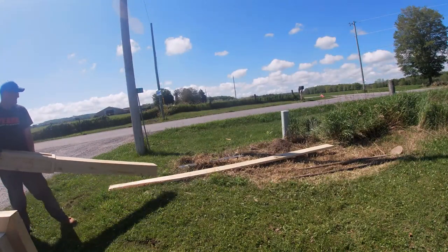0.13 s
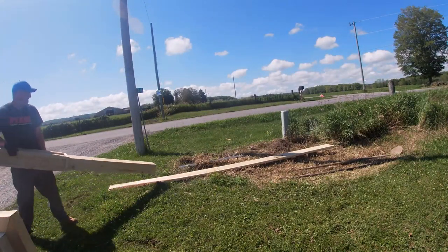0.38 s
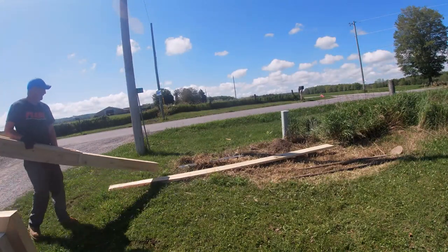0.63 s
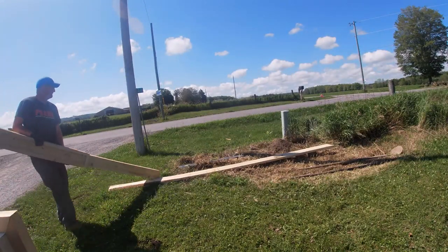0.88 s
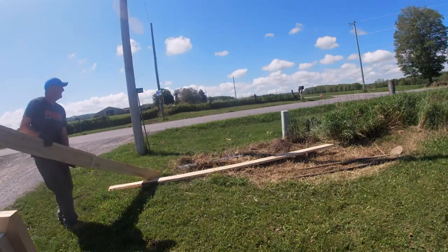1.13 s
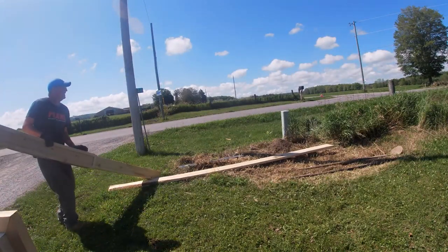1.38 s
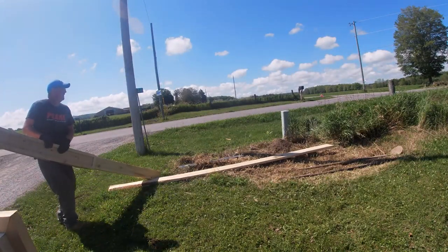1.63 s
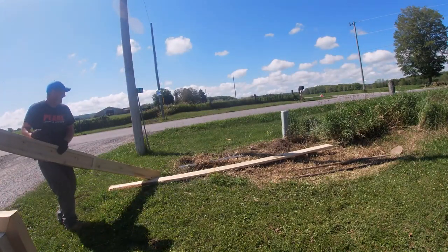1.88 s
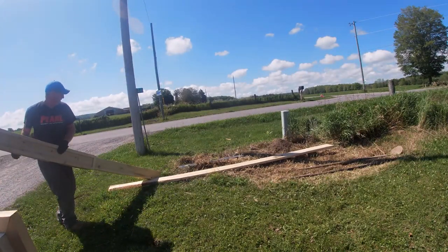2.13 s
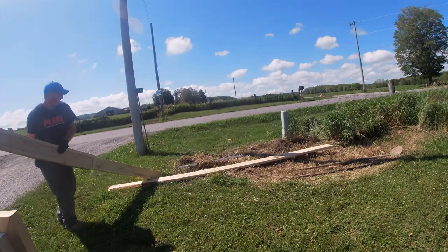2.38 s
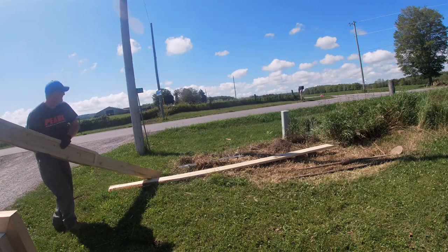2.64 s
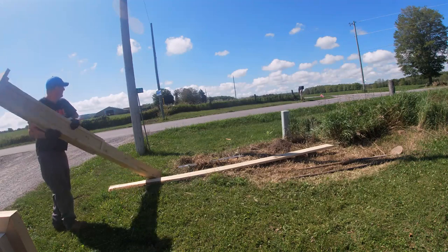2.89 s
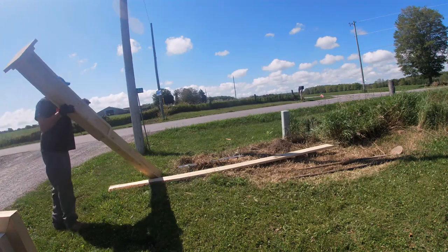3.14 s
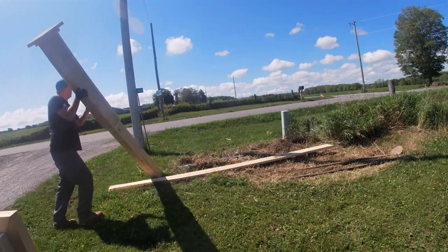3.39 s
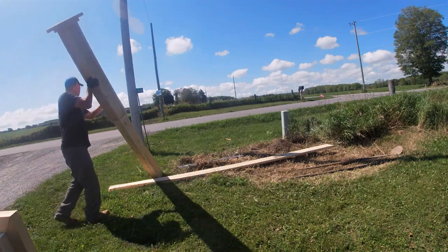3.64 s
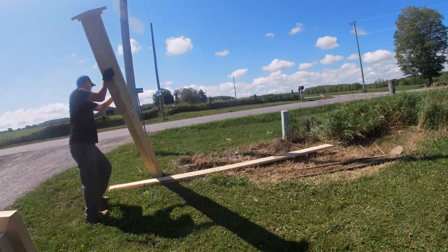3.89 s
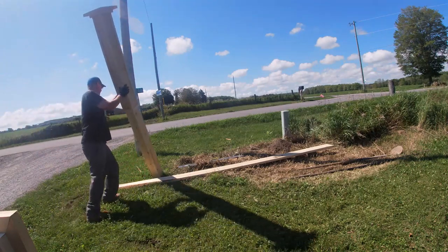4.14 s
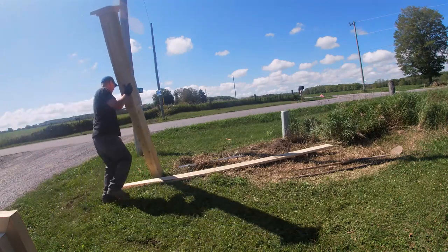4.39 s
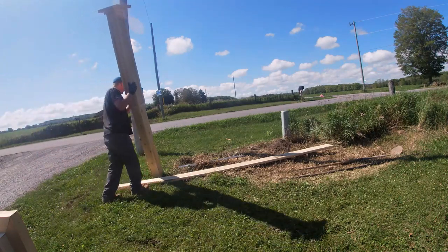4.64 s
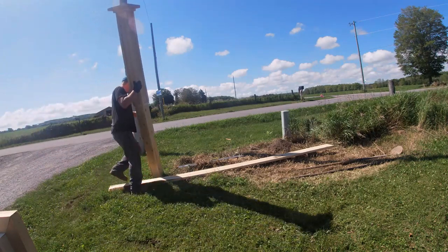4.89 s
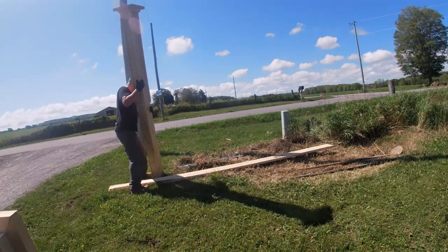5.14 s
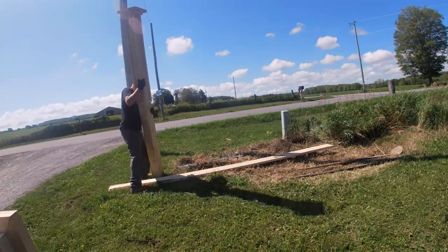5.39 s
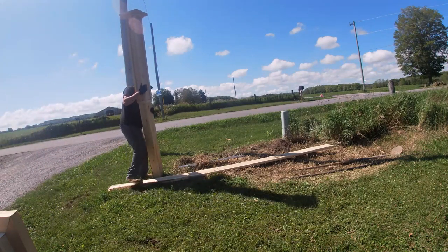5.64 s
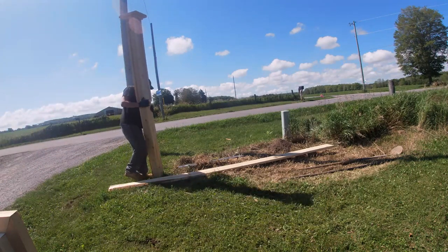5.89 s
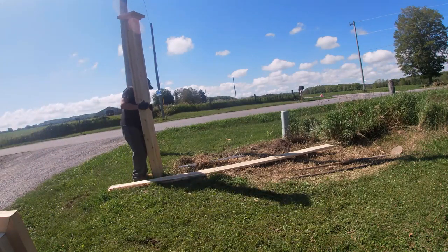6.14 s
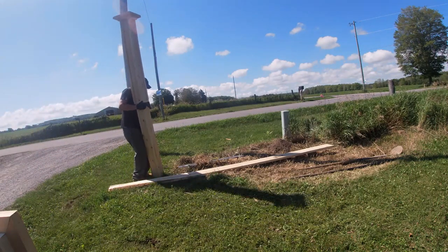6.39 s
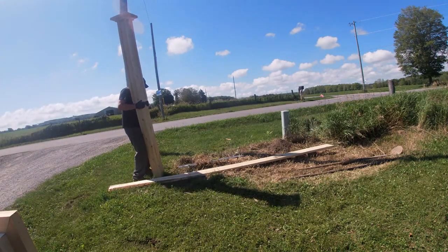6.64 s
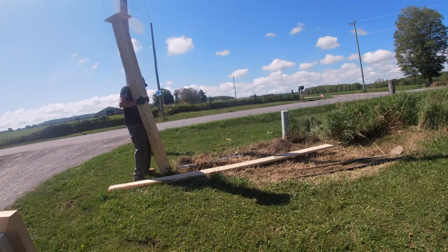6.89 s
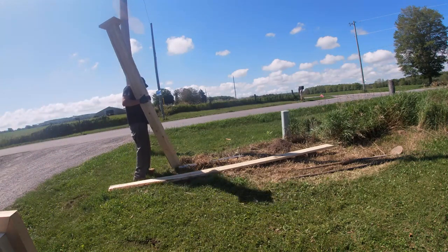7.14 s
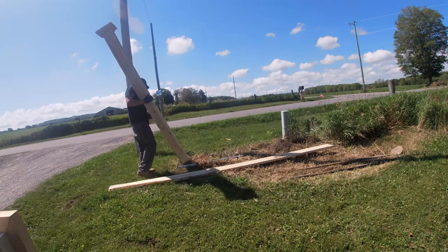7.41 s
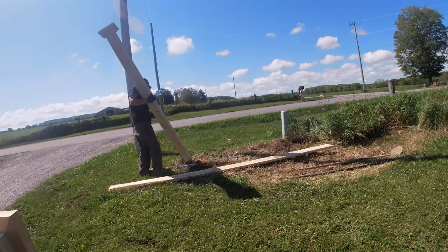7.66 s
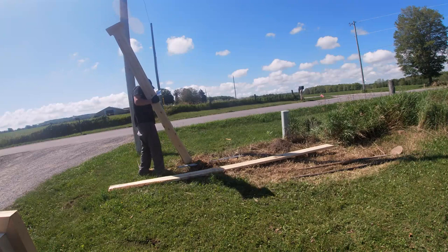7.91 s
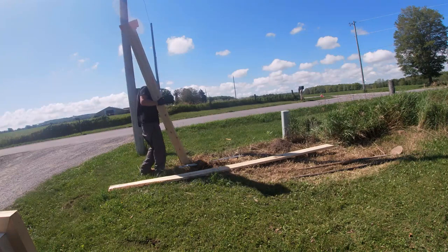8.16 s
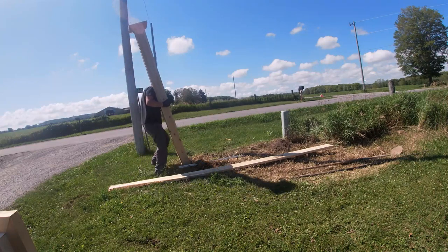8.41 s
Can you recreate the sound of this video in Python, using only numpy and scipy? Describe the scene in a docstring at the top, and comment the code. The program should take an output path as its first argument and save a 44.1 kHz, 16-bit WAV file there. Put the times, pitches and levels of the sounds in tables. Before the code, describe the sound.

Outdoors, hollow wooden knocks and dull thumps with gloved rubbing and grass rustle, over low engine rumble, wind buffeting and chirping birds.

```python
"""A worker handles a hollow wooden post by a country road, over far hiss, an idling engine and grass brushing.
Bird whistles, a soft gust and a faint low-mid scuff of filtered noise open it; ringing modal knocks begin
at half a second, stronger rubs after one. A thin insect whine fades after 2.5 s, while gusts of low noise
buffet the microphone until about 5 s. The densest knocks land near 4.7 s, the strongest gust near 6.5 s.
Climbing and falling bird notes, drawn as bent sine sweeps, lead to a buzzy chopped note at 8 s."""
import sys
import numpy as np
from scipy import signal
from scipy.fft import rfft, irfft, next_fast_len
from scipy.io import wavfile
from scipy.ndimage import map_coordinates

SR = 44100
rng = np.random.default_rng(int(sys.argv[2]) if len(sys.argv) > 2 else 0)


def generate_wav(signal):
    """Clip the signal to [-1, 1] and save it as 16-bit WAV at the path in sys.argv[1]."""
    frames = np.transpose(np.atleast_2d(signal))
    scaled = np.clip(frames, -1, 1) * 32767
    pcm = np.round(scaled).astype(np.int16)
    wavfile.write(sys.argv[1], SR, pcm)


def decibels_to_gain(level_db):
    """Convert a level in decibels to a linear amplitude gain (20 dB per decade)."""
    exponent = np.asarray(level_db, float) / 20
    return 10 ** exponent


N = 376173


def unit(x):
    """Scales x to rms 1."""
    return x / np.sqrt(np.mean(x ** 2) + 1e-20)


def along(points, hz):
    """Reads (Hz, value) points at hz on a log frequency axis."""
    f, v = np.transpose(points)
    return np.interp(np.log(hz + 1), np.log(f + 1), v)


def curves(rows):
    """Gives one value per sample for each column after the time."""
    s, *cols = np.transpose(rows)
    return [np.interp(np.arange(N) / SR, s, c) for c in cols]


def wobble(rate):
    """A smooth random curve with rate knots a second."""
    knots = rng.standard_normal(int(N * rate / SR) + 4)
    return map_coordinates(knots, [np.arange(N) * rate / SR])


def coloured(x, spectrum, db):
    """Noise x under a level curve, then through a spectrum that is silent outside its ends."""
    m = next_fast_len(N + 8192)
    hz = np.fft.rfftfreq(m, 1 / SR)
    inside = (hz > spectrum[0][0]) * (hz < spectrum[-1][0])
    gain = decibels_to_gain(along(spectrum, hz)) * inside
    return irfft(rfft(unit(x) * decibels_to_gain(db), m) * unit(gain), m)[:N]


def grainy(spiky_db, rate):
    """Noise whose loudness varies from grain to grain."""
    return rng.standard_normal(N) * decibels_to_gain(spiky_db * wobble(rate))


def add(track, s, sound):
    """Lays a short sound on a track at time s."""
    part = track[max(round(s * SR), 0):][:len(sound)]
    part += sound[:len(part)]


def swells(s, rise_s, fall_s, db, bed_db):
    """Level in dB of events that climb 20 dB to a peak and die 20 dB again, summed in power over a bed."""
    t = np.arange(0, N / SR + .01, .002)
    late = t[:, None] - s
    drop_db = 20 * np.maximum(-late / np.abs(rise_s), late / np.abs(fall_s))
    power = decibels_to_gain(2 * (db - drop_db)).sum(axis=1)
    return 10 * np.log10(np.interp(np.arange(N) / SR, t, power) + decibels_to_gain(2 * bed_db))


# Outdoor echo. Each row: frequency in Hz, time to die 60 dB in seconds at a reach of 1.
FIELD_DECAY = [(200, 0.89), (2500, 0.43), (9000, 0.069)]


def echo(x, reach):
    """Scatter from ground, poles and hedges; each frequency dies at its own speed, sooner at small reach."""
    hz, t, z = signal.stft(rng.standard_normal(SR // 2), SR, nperseg=256)
    t60 = reach * along(FIELD_DECAY, hz)[:, None]
    tail = signal.istft(z * decibels_to_gain(-60 * t / t60), SR, nperseg=256)[1]
    delayed = np.pad(x, (150, 0))
    return signal.fftconvolve(delayed, tail / np.linalg.norm(tail))[:N]


# Colour of the far hiss. Each row: frequency in Hz, relative level in dB per Hz.
HISS_SPECTRUM = [(71, -21.5), (120, -8.5), (271, -24.5), (415, -32.5), (563, -31.5), (676, -25.5),
                 (829, -26), (955, -34), (1830, -37.5), (3110, -39), (3510, -41), (7920, -40.5),
                 (9510, -49), (12400, -56), (15500, -62)]
# Thin insect whine. Each row: time in seconds, level in dB before its waver.
INSECT_WHINE = [(0, -80), (2.5, -81), (2.7, -100)]


def background():
    """Far road and leaves blur into a smooth hiss; a sine with a trembling pitch is the insect whine."""
    whine_hz = 6880 + 45 * wobble(90)
    whine_level = curves(INSECT_WHINE)[0] + 2.2 * wobble(15)
    whine = np.sin(2 * np.pi * np.cumsum(whine_hz) / SR) * decibels_to_gain(whine_level)
    hiss = coloured(rng.standard_normal(N), HISS_SPECTRUM, -62 + 2.06 * wobble(2.74))
    return hiss + whine


# Engine orders. Each row: multiple of the firing rate, level in dB relative to the engine level.
ENGINE_ORDERS = [(.5, -17), (1, 0.5), (1.5, -19), (2, -15), (2.26, -16)]


def engine():
    """Firing pulses heard as a strong fundamental; the weak orders waver more."""
    idle_hz, engine_db = 51.8, -40  # mean firing rate, reference level
    firing_hz = idle_hz + .5 * wobble(1.55) + 0.383 * wobble(6)
    turn = 2 * np.pi * np.cumsum(firing_hz) / SR
    out = np.zeros(N)
    for k, level in ENGINE_ORDERS:
        waver_db = 1.2 if k == 1 else 4
        out += decibels_to_gain(level + waver_db * wobble(8)) * np.sin(k * turn + rng.uniform(0, 2 * np.pi))
    return decibels_to_gain(engine_db) * out


# Gusts. Each row: peak time in seconds, build-up in seconds, peak level in dB for a layer at the eddy pitch,
# eddy pitch in octaves above 50 Hz.
WIND_GUSTS = [(0.0, 0.32, -43.5, 0.26), (1.0, 0.14, -44.5, 0.72), (1.32, 0.41, -49, -0.2),
              (1.9, 0.15, -45.5, -0.73), (2.2, 0.13, -33, -0.32), (2.31, 0.36, -41, -0.69),
              (2.75, 0.16, -38.5, -0.46), (2.891, 0.047, -33, 0.42), (2.97, 0.25, -31, 0.74),
              (3.13, 0.082, -24.5, 0.49), (3.189, 0.036, -26.5, 0.51), (3.45, 0.27, -47.5, 0.32),
              (3.58, 0.066, -44, 0.2), (3.731, 0.062, -36, -0.051), (3.85, 0.2, -36, -0.29),
              (4.0, 0.39, -37, 0.54), (4.13, 0.36, -43, 0.64), (4.21, 0.082, -40.5, 1.3),
              (4.31, 0.21, -33.5, 0.68), (4.43, 0.19, -30.5, -0.64), (4.48, 0.04, -31, -0.54),
              (4.7, 0.11, -40, .6), (4.83, 0.17, -38, 0.12), (4.961, 0.021, -28.5, -0.019),
              (5.01, 0.066, -30.5, -0.37), (5.13, 0.18, -40, -0.27), (6.491, 0.054, -23, -0.78),
              (6.56, 0.033, -31, 0.11), (6.74, .2, -51.5, 0.2), (7.07, 0.3, -42.5, -0.8),
              (8.42, 0.15, -36, -0.48)]
# Colours of the slow heave, the deep rumble and the flutter.
# Each row: frequency in Hz, relative level in dB per Hz.
HEAVE_SPECTRUM = [(14, -48), (24, -10.5), (32, -3), (48, -9), (75, -42)]
DEEP_SPECTRUM = [(40, -18), (62, -4), (85, -6), (115, -13), (170, -61)]
FLUTTER_SPECTRUM = [(70, -29), (110, 4), (170, 1.5), (250, -9.5), (400, -24), (700, -38.5), (1200, -51)]


def wind():
    """Eddies push the microphone in uneven lumps; the faster ones flutter higher."""
    fall_ratio, spread_db = 1.33, 5.5  # dying time over build-up, loss one octave from the eddy pitch
    s, rise_s, db, pitch = np.transpose(WIND_GUSTS)

    def level(octave, lull_db=-64):
        """Gust level in dB for a layer at this octave."""
        layer_db = db - spread_db * (pitch - octave) ** 2
        return swells(s, rise_s, fall_ratio * rise_s, layer_db, lull_db)

    heave = coloured(grainy(spiky_db=-0.5, rate=12), HEAVE_SPECTRUM, level(-0.2, lull_db=-63))
    deep = coloured(grainy(spiky_db=1.0, rate=49), DEEP_SPECTRUM, level(0.3))
    flutter = coloured(grainy(spiky_db=2.5, rate=50), FLUTTER_SPECTRUM, level(1.6) + 1)
    return heave + deep + flutter


def chatter(count, db):
    """Distant birds: faint short sweeps scattered in time and pitch."""
    out = np.zeros(N)
    for when, pitch, bend, size, span in rng.uniform(0, 1, (count, 5)):
        u = np.linspace(0, 1, round((0.022 + 0.03 * span) * SR))
        hz = (2300 + 2300 * pitch ** 2) * (1 + 0.26 * (bend - .6) * u)
        sweep = np.sin(np.pi * u) * np.sin(2 * np.pi * np.cumsum(hz) / SR)
        add(out, when * N / SR, decibels_to_gain(db - 4.0 * size) * sweep)
    return out


# Buzzy note. One row: start in seconds, length in seconds, starting pitch in Hz, pulses per second,
# starting level in dB.
BUZZY_NOTE = (8.04, .16, 4500, 170, -55.5)


def buzz():
    """A buzzy bird note: a rough whistle chopped into fast, uneven pulses."""
    s, length, hz, rate_hz, db = BUZZY_NOTE
    out, t = np.zeros(N), np.arange(round(length * SR)) / SR
    uneven = np.cumsum(rng.normal(0, .012, len(t)))
    pulses = np.sin(np.pi * rate_hz * t + uneven) ** 6
    rough = np.cumsum(rng.normal(0, .08, len(t)))
    whistle = np.sin(2 * np.pi * hz * t * (1 - 0.0135 * t / length) + rough)
    add(out, s, decibels_to_gain(db - 5 * t / length) * pulses * whistle)
    return out


# Gently arched whistles, steeply arched whistles, then sliding and level notes.
# Each row: start in seconds, length in seconds, first pitch in Hz, last pitch in Hz, level in dB.
GENTLE_ARCHES = [(0.77, 0.078, 3000, 2685, -62.5), (1.452, 0.067, 4130, 3150, -65),
                 (1.62, 0.086, 4050, 3240, -67.5), (3.223, 0.09, 2730, 3380, -65.5),
                 (4.477, 0.062, 2640, 2640, -59.5), (4.532, 0.059, 2900, 2824, -58),
                 (4.815, 0.045, 2450, 2726, -62.5), (5.448, 0.047, 2400, 2340, -58.5),
                 (5.572, 0.065, 2330, 2323, -61.5)]
STEEP_ARCHES = [(.01, 0.077, 2405, 2280, -54.5), (.095, 0.074, 2970, 2710, -59),
                (4.695, 0.056, 2450, 2310, -57), (5.632, 0.075, 2580, 2640, -59),
                (6.405, 0.059, 3190, 2640, -57)]
SLIDING_NOTES = [(0.089, 0.031, 4280, 3570, -66), (0.18, 0.083, 2430, 2900, -62),
                 (0.243, 0.045, 2290, 2460, -65.5), (0.722, 0.051, 2787, 2850, -57),
                 (1.357, 0.047, 4150, 3300, -69), (1.82, 0.04, 4050, 4050, -66),
                 (1.858, 0.035, 3680, 3500, -57), (1.435, 0.03, 3490, 2700, -68),
                 (1.612, 0.043, 4050, 3300, -69), (1.9, 0.14, 3030, 3010, -73.5),
                 (2.272, 0.21, 3065, 3016, -67), (2.612, .02, 4500, 4600, -64),
                 (2.699, 0.17, 3560, 3540, -61), (2.772, .022, 4730, 4560, -66),
                 (2.842, .02, 4600, 4570, -66), (2.905, .025, 4580, 4580, -66),
                 (3.007, 0.039, 2700, 3280, -62), (3.026, 0.062, 3260, 3190, -61),
                 (2.667, .03, 4000, 3630, -69), (4.128, .02, 3750, 3690, -63),
                 (3.459, 0.042, 4420, 3380, -60), (3.63, 0.049, 4240, 3400, -57.5),
                 (3.819, 0.029, 4130, 3370, -57.5), (3.933, 0.022, 4040, 3560, -60.5),
                 (4.03, 0.031, 3710, 3700, -65), (5.976, 0.024, 2260, 2240, -62.5),
                 (6.258, 0.017, 4050, 4100, -58), (6.338, .017, 4180, 4020, -61.5),
                 (6.463, 0.037, 2730, 2530, -68.5), (6.523, 0.083, 3120, 3020, -69),
                 (7.287, .01, 3950, 4600, -62), (7.257, .035, 4680, 4770, -62.5),
                 (7.43, 0.033, 6500, 7360, -66), (7.557, 0.028, 4695, 4820, -54),
                 (7.583, 0.01, 3900, 4650, -57), (7.666, 0.031, 6400, 7300, -58.5),
                 (7.789, 0.028, 4680, 4800, -53), (7.814, 0.011, 3700, 4700, -55),
                 (7.952, 0.051, 5100, 5035, -54.5), (8.35, .07, 3750, 3580, -67),
                 (8.488, 0.012, 4730, 4430, -59), (8.269, 0.045, 2155, 2180, -67.5)]
# Falls that flatten into a tail. Each row: start in seconds, starting level in dB.
FALLING_NOTES = [(7.19, -60), (7.484, -54), (7.721, -53)]
# Short climbs ending in a high and a low pip. Each row: time in seconds, reference level in dB.
CLIMBING_CALLS = [(6.385, -64), (6.552, -66.5), (6.72, -61), (6.882, -62), (7.075, -64.5), (7.235, -64)]
# Parts of a climb. Each row: delay in seconds, length in seconds, first pitch in Hz, last pitch in Hz,
# level in dB over the reference.
CLIMB_PARTS = [(-.004, 0.023, 2207, 2610, -5), (.015, 0.01, 2820, 3320, 1.5), (0.022, .011, 2380, 2680, 3)]


def bird_notes():
    """Lists every note as start, length, first, middle and last pitch, level and fade in dB."""
    notes = []
    # lift: middle pitch over the mean of the ends
    for rows, lift in ((GENTLE_ARCHES, 1.07), (STEEP_ARCHES, 1.25)):
        notes += [(s, length, a, lift * (a + b) / 2, b, db, 0) for s, length, a, b, db in rows]
    sag = .12  # a slide lingers low: share of its span under the straight line
    for s, length, a, b, db in SLIDING_NOTES:
        notes.append((s, length, a, (a + b) / 2 - sag * abs(b - a), b, db, 0))
    for s, db in FALLING_NOTES:
        notes.append((s, .054, 3250, 2520, 2340, db, 19))
    for s, db in CLIMBING_CALLS:
        for late, length, a, b, part_db in CLIMB_PARTS:
            notes.append((s + late, length, a, (a + b) / 2, b, db + part_db, 0))
    return notes


def birds():
    """Whistles bend through three pitches; arched ones come unsteady from behind a hedge, with more echo."""
    out, behind, waver = np.zeros(N), np.zeros(N), wobble(150)
    for s, length, first_hz, mid_hz, last_hz, db, fade_db in bird_notes():
        u = np.linspace(0, 1, round(length * SR))
        # parabola through the three pitches
        hz = first_hz * (1 - u) * (1 - 2 * u) + 4 * mid_hz * u * (1 - u) + last_hz * u * (2 * u - 1)
        arched = mid_hz > (first_hz + last_hz + 1) / 2
        if arched:
            hz = hz * (1 + 0.014 * np.resize(waver[round(s * SR):], len(u)))
        envelope = decibels_to_gain(db - fade_db * u) * np.sqrt(np.abs(np.sin(np.pi * u)))
        add(behind if arched else out, s, envelope * np.sin(2 * np.pi * np.cumsum(hz) / SR))
    out = out + decibels_to_gain(-2) * (behind + decibels_to_gain(-4) * echo(behind, reach=.6))
    return out * decibels_to_gain(1.5 * wobble(80))


# Strokes of gloves, cloth and grass. Each row: peak time in seconds, build-up in seconds,
# dying time in seconds, peak level in dB before the layer trims, brightness in dB before each layer's share.
BRUSH_STROKES = [(.14, 0.23, 0.67, -80.5, 7.5), (0.977, 0.012, 0.098, -55.5, -2.5),
                 (1.008, 0.036, 0.045, -60, 4), (1.038, 0.04, 0.088, -60.5, -1),
                 (1.115, .04, 0.075, -60.5, -2), (1.17, 0.05, 0.083, -61.5, -5.5),
                 (1.23, 0.52, 0.24, -64.5, 0), (1.31, 0.081, 0.1, -67.5, -3),
                 (1.455, 0.036, 0.038, -65, -5), (1.76, 0.044, 0.075, -65.5, -5),
                 (1.89, 0.13, 0.096, -67.5, -2), (2.53, 0.052, 0.28, -72, 4.5),
                 (2.79, 0.73, 0.15, -76, -6.5), (2.92, 0.037, 0.041, -73, -10),
                 (3.171, 0.024, 0.19, -66, -0.5), (3.35, 0.042, 0.098, -62, -2),
                 (3.4, 0.049, 0.087, -61, 0), (3.577, 0.14, 0.081, -61.5, 0.5), (3.96, .04, 0.22, -73, 0.5),
                 (4.05, 0.2, 0.074, -64, 0.5), (4.101, 0.063, 0.042, -54.5, 3.5),
                 (4.19, 0.066, 0.13, -64.5, -3.5), (4.67, 0.06, 0.14, -61, 2),
                 (4.691, 0.008, 0.04, -58.5, -3), (5.23, 0.081, 0.18, -68.5, 4.5),
                 (5.65, 0.16, 0.18, -69, -2), (5.97, 0.16, 0.075, -66, -2), (6.2, 0.21, 0.17, -69, 0.5),
                 (6.97, 0.49, 0.26, -75, 9.5), (7.43, 0.16, 0.075, -72.5, -5.5), (8.15, .2, 0.3, -75.5, -2)]
# Steady brushing between the strokes. Each row: time in seconds, level in dB before the layer trims.
BRUSHING_BED = [(0, -84), (.7, -86), (1.4, -74), (2.2, -82.5), (2.9, -78), (3.3, -78), (3.8, -76.5),
                (4.8, -69.5), (5.1, -79.5), (5.8, -73.5), (6.53, -77.5), (6.9, -72.5), (7.7, -73.5),
                (8.53, -69.5)]
# Colours of the fine grains, the bright sheen and the coarse scrape.
# Each row: frequency in Hz, relative level in dB per Hz.
FINE_SPECTRUM = [(1200, -5.5), (2000, -9), (3500, -1), (5000, -3.5), (8000, -19)]
SHEEN_SPECTRUM = [(3500, -16.5), (6000, -2), (8300, -4.5), (9500, -14.5), (13000, -21.5), (15500, -40)]
COARSE_SPECTRUM = [(300, 4.5), (600, -10), (1200, 1.5), (1900, -2.5), (3000, 1.5), (5000, -33)]


def rustle():
    """Fibres and grass blades slip in dense tiny grains; bright strokes hiss more, dull ones scrape more."""
    s, rise_s, fall_s, peak_db, bright_db = np.transpose(BRUSH_STROKES)

    def level(tilt):
        """Stroke level in dB for a layer that takes this share of the brightness."""
        return swells(s, rise_s, fall_s, peak_db + tilt * bright_db, curves(BRUSHING_BED)[0])

    fine_db = level(0) + 2.5 + 2.5 * wobble(40)
    sheen_db = level(0.98) - 0.5 + 1.2 * wobble(40)
    coarse_db = level(-0.83) - 0.5 + 2.56 * wobble(30)
    fine = coloured(grainy(spiky_db=2.2, rate=250), FINE_SPECTRUM, fine_db)
    sheen = coloured(grainy(spiky_db=2.2, rate=250), SHEEN_SPECTRUM, sheen_db)
    coarse = coloured(grainy(spiky_db=1.0, rate=130), COARSE_SPECTRUM, coarse_db)
    return fine + sheen + coarse


# Rubs and broad faint scuffs. Each row: start in seconds, length in seconds, centre pitch in Hz, width in Hz,
# level in dB at the middle.
RUBS_AND_SCUFFS = [(0, 0.39, 480, 500, -72), (1.185, 0.14, 710, 306, -56.5), (1.385, 0.11, 820, 246, -58),
                   (1.844, 0.077, 880, 300, -61), (2.756, 0.084, 640, 198, -55.5),
                   (3.332, 0.093, 663, 308, -58), (3.955, 0.028, 1150, 250, -62),
                   (5.173, 0.13, 395, 220, -70), (5.624, 0.42, 1550, 406, -69.5),
                   (5.501, .85, 550, 560, -67.5)]


def rubs_and_scuffs():
    """Rubs and broad faint scuffs: swells of uneven band-passed noise around one centre pitch."""
    out = np.zeros(N)
    for s, length, hz, width_hz, db in RUBS_AND_SCUFFS:
        u = np.linspace(0, 1, round(length * SR))
        band = signal.butter(1, [hz - width_hz / 2, hz + width_hz / 2], "bandpass", fs=SR, output="sos")
        uneven = rng.standard_normal(len(u)) * np.exp(0.47 * rng.standard_normal(len(u)))
        add(out, s, decibels_to_gain(db) * np.sin(np.pi * u) * unit(signal.sosfilt(band, uneven)))
    return out


def crack(t, t60, edges_hz, order):
    """A bright snap: a dying burst of band-passed noise."""
    band = signal.butter(order, edges_hz, "bandpass", fs=SR, output="sos")
    return decibels_to_gain(-60 * t / t60) * signal.sosfilt(band, rng.standard_normal(len(t)))


# Blows on the post. Each row: start in seconds, level in dB that scales the whole knock,
# lowest strong pitch in Hz, highest strong pitch in Hz, ring time factor.
POST_BLOWS = [(0.514, -39, 244, 595, 0.2), (0.977, -43.5, 317, 1500, 1.17), (1.006, -35, 120, 217, 0.7),
              (1.743, -51, 1000, 2500, 0.39), (1.757, -41, 900, 1840, 0.62),
              (2.4935, -48.5, 700, 1800, 0.36), (2.5075, -28, 464, 2630, 0.65),
              (4.685, -34.5, 199, 1590, 0.69), (4.71, -33, 89.4, 149, 0.47), (4.709, -32, 250, 350, 1.7),
              (4.731, -40, 330, 520, 1.5), (4.77, -52, 400, 1400, .7)]
# Modes of the post. Each row: frequency in Hz, level in dB within a knock,
# time to die 60 dB in seconds at a ring time factor of 1.
POST_MODES = [(120, 6, 0.093), (164.3, 12, 0.14), (217, 0.5, 0.16), (299.5, -0.5, 0.16), (419, 0, 0.093),
              (540, 2.5, 0.077), (698, -4, 0.089), (795, -1, 0.053), (880, 3.5, 0.043), (1030, 2.5, 0.035),
              (1315, -2, 0.05), (1425, -1, 0.058), (1500, -6, 0.035), (1660, -3, 0.053), (1925, 1.5, 0.038),
              (2200, 5, 0.019), (2900, -13, 0.037), (5640, -16, .03)]
# Short bright ticks, several of them the sharp snap at the onset of a blow.
# Each row: start in seconds, level in dB before a 4 dB cut.
BRIGHT_TICKS = [(.513, -43.5), (0.978, -38), (1.6275, -43.5), (2.5082, -39), (2.986, -44), (3.543, -37.5),
                (5.399, -41), (7.446, -48)]


def knock(t, low_hz, high_hz, ring):
    """Contact snaps, dense body noise thuds and modes ring; wood grain blurs them, low ones build slowly."""
    snap_db = -12 + 10 * np.log2(high_hz / 1000)  # harder contact snaps louder
    sound = decibels_to_gain(snap_db) * crack(t, t60=0.027, edges_hz=[1500, 7800], order=5)
    band = signal.butter(2, [low_hz, high_hz], "bandpass", fs=SR, output="sos")
    body = unit(signal.sosfilt(band, rng.standard_normal(len(t))))
    sound += decibels_to_gain(-8 - 60 * t / 0.054) * body
    for hz, level, t60 in POST_MODES:
        rough = np.cumsum(rng.normal(0, .016, len(t)))
        gain = decibels_to_gain(level + rng.normal(0, 0.29)) / (1 + (hz / high_hz) ** 4) / (1 + (low_hz / hz) ** 4)
        envelope = decibels_to_gain(-60 * t / (t60 * ring)) * (1 - np.exp(-t * hz / 1.03))
        sound += gain * envelope * np.sin(2 * np.pi * hz * t + rough)
    return sound * (1 - np.exp(-t / 0.0012))


def post():
    """Every blow rings the same modes: a light slap skips the low ones, a soft thud the high ones."""
    out, t = np.zeros(N), np.arange(SR // 3) / SR
    for s, db, low_hz, high_hz, ring in POST_BLOWS:
        add(out, s, decibels_to_gain(db) * knock(t, low_hz, high_hz, ring))
    for s, db in BRIGHT_TICKS:
        add(out, s, decibels_to_gain(db - 4) * crack(t, t60=.014, edges_hz=[2400, 7500], order=2))
    return out


def scene():
    """Mixes all sources to one channel, with a short echo on knocks and rubs and a longer one on the birds."""
    handling = post() + rubs_and_scuffs()
    song = birds() + buzz() + chatter(count=45, db=-71.5)
    near = handling + decibels_to_gain(-14) * echo(handling, reach=.3)
    far = song + decibels_to_gain(-10.5) * echo(song, reach=0.75)
    return (near + far + rustle() + wind() + engine() + background())[None]


def band_limit(x):
    """A steep low-pass at the top of the band."""
    return signal.sosfilt(signal.butter(12, 15710, fs=SR, output="sos"), x)


def record(dry):
    """Turns the finished mix into the final sound."""
    return band_limit(dry)


dry = scene()
out = record(dry)
generate_wav(out)
```